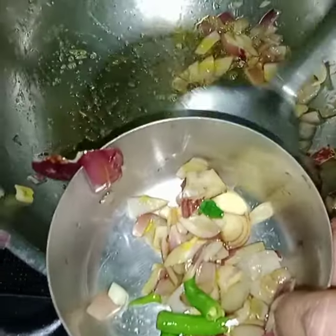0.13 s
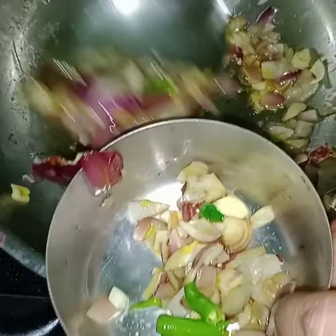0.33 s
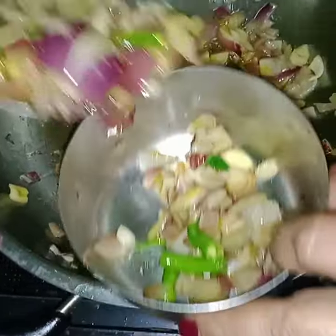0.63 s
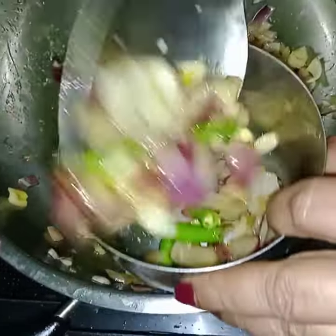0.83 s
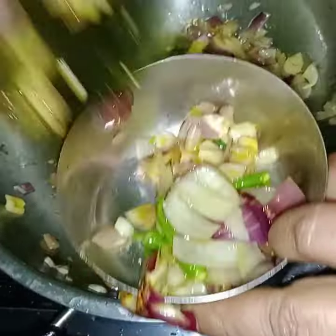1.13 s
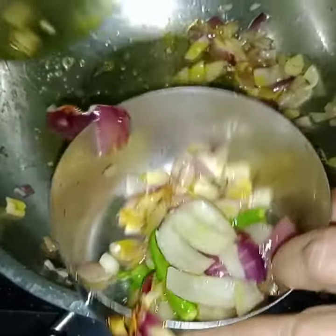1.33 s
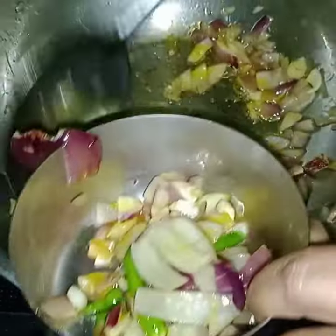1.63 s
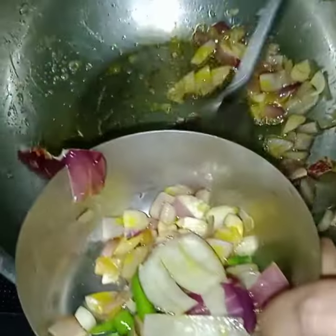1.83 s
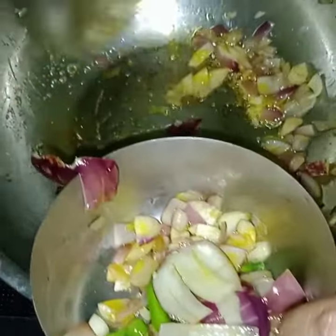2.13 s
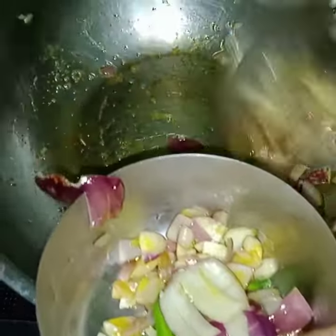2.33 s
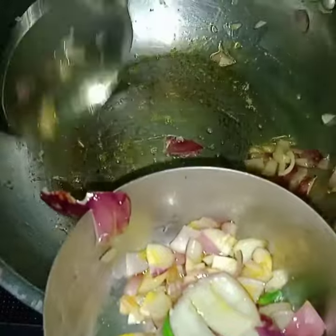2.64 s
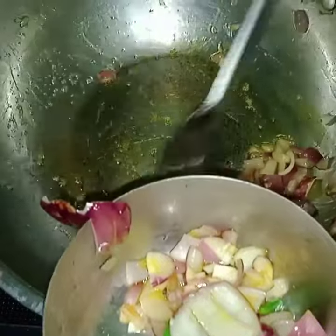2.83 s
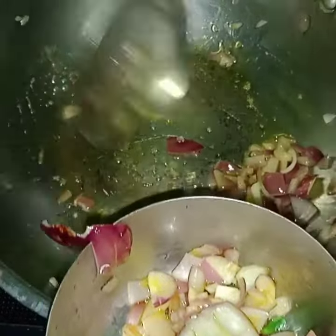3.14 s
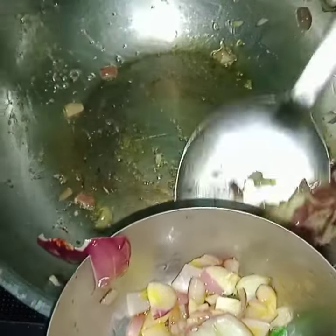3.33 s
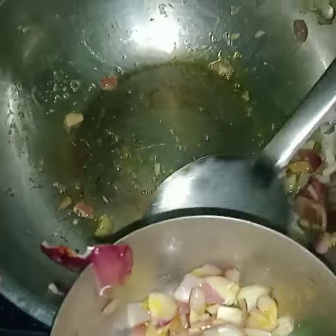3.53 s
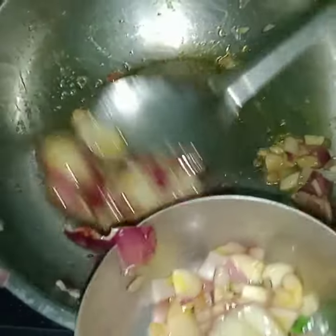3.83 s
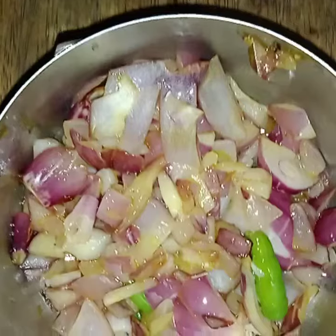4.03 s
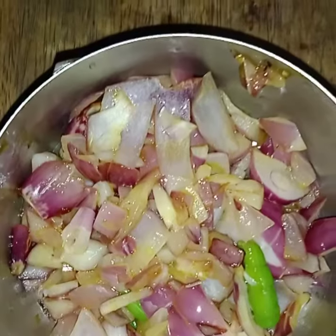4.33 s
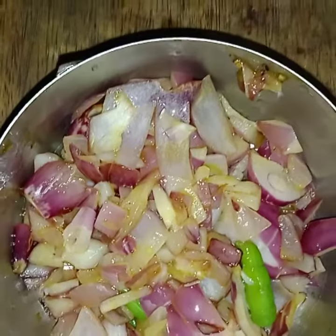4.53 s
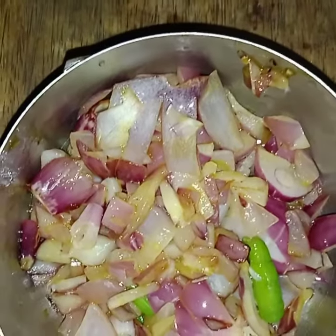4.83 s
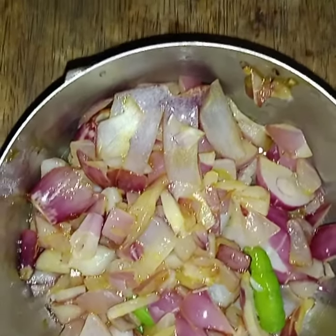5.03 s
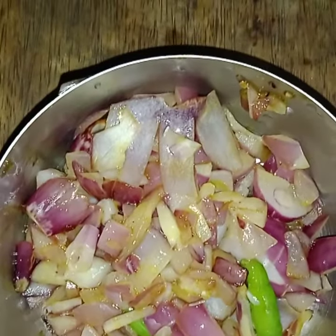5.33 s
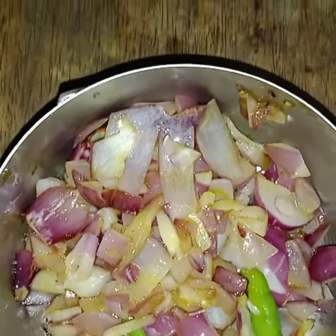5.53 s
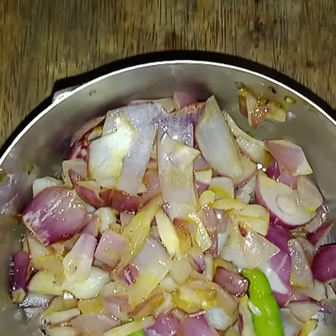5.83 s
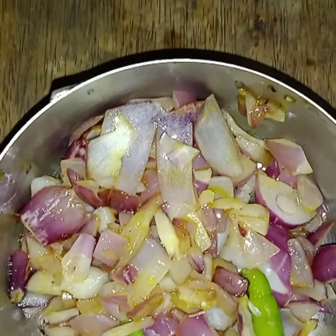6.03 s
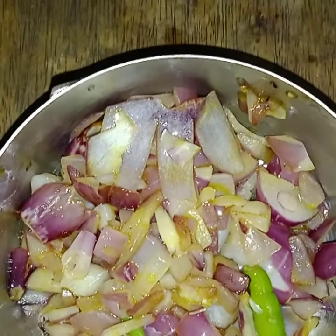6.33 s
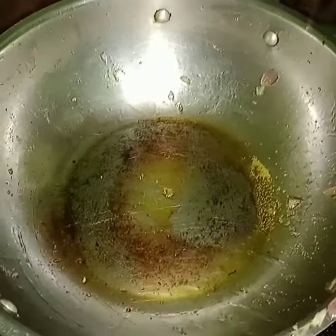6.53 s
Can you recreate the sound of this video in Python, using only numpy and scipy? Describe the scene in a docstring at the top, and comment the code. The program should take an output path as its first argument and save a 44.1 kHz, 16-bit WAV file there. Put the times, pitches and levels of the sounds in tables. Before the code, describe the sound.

A steady soft hiss with a low rumble runs throughout. A wavering whistle rises first, then a short bright rustle and ticks close by. Birds sweep quickly up and drop down, and one near bird gives three rising and falling whoops, each louder. Low hoots recur among distant whistles, and harsh rasping chatter crowds the end. The microphone is beside the hissing cooking, with the birds echoing among walls outside.

```python
"""First a wavering whistle rises over a steady hiss and low rumble; a rustle and a few ticks follow.
Birds outside a kitchen: a near one whoops three rising and falling calls, another sweeps fast arches
and falls, many more whistle, hoot and rasp. Bird notes are frequency-modulated sines, blurred by narrow
noise and echoed among walls. The hiss and rustle are filtered noise; ticks and thumps decay exponentially."""
import sys
import numpy as np
from scipy import signal
from scipy.fft import rfft, irfft
from scipy.io import wavfile
from scipy.ndimage import uniform_filter1d

SR = 44100
rng = np.random.default_rng(int(sys.argv[2]) if len(sys.argv) > 2 else 0)


def master(y):
    """Save y as 16-bit WAV."""
    cut = np.clip(np.atleast_2d(y).T, -1, 1)
    pcm = np.round(cut * 32767)  # scale
    wavfile.write(sys.argv[1], SR, pcm.astype(np.int16))


def boost(x):
    """Linear amplitude factor 10**(x/20) for a level x in decibels (scalar or array-like)."""
    u = np.asarray(x, float) / 20
    return 10 ** u


N = 294147


def evened(x):
    """Normalization: scales a signal to unit rms."""
    return x / np.sqrt(np.mean(abs(x) ** 2) + 1e-20)


def read(points, hz):
    """Spectral interpolation: reads a curve on a logarithmic frequency axis."""
    f, value = np.transpose(points)
    return np.interp(np.log(hz + 1), np.log(f + 1), value)


def add(mix, s, sound):
    """Superposition: adds a sound to the mix from time s."""
    part = mix[max(round(s * SR), 0):][:len(sound)]
    part += sound[:len(part)]


def wander(width_hz):
    """Narrow-band noise: complex, low-passed by two equal poles to vary about width_hz times a second."""
    r = np.exp(-np.pi * width_hz / SR)
    z = rng.standard_normal((N, 2)) @ [1, 1j]
    return evened(signal.lfilter([1], np.convolve([1, -r], [1, -r]), z))


def coloured(points, patchy_db):
    """Filtered noise: random short-time spectra follow a curve, with patches that drift in time."""
    a, b, patches = rng.standard_normal((N // 256 + 5, 513, 3)).T
    patches = uniform_filter1d(patches, size=12, axis=0)
    patches = evened(uniform_filter1d(patches, size=12, axis=1))
    shape_db = read(points, np.fft.rfftfreq(1024, 1 / SR))[:, None] + patchy_db * patches
    noise = signal.istft((a + 1j * b) * boost(shape_db), nperseg=1024, noverlap=768)[1]
    return evened(noise[:N])


# Steady noise floor, spectral density before scaling to unit rms: f/Hz, level/dB
FLOOR_SPECTRUM = [(18, -65), (30, -6), (97, 2), (332, -2.5), (512, -3), (771, -7), (970, -5.5), (2040, -8),
                  (2840, -6.5), (3140, -8), (4860, -15.5), (6270, -13), (10700, -29.5), (13500, -45)]
# Thin high fizz, rms level over time: t/s, level/dB
FIZZ_LEVEL = [(0.0, -91), (0.13, -80), (0.24, -66.5), (0.43, -80.5), (0.8, -87), (1.06, -82), (1.76, -77.5),
              (2.06, -82), (3.53, -85), (3.99, -77), (4.22, -83), (5.07, -81.5), (5.2, -80), (5.79, -72.5),
              (6.15, -76), (6.43, -81), (6.67, -74)]


def hiss():
    """Stationary broadband noise, with a band of fizz at the very top whose level varies in time."""
    fizz_spectrum = [(9000, -18), (13000, -13), (14500, -10.5), (15600, -3.5), (16400, -23.5)]
    fizz_db = np.interp(np.arange(N) / SR, *np.transpose(FIZZ_LEVEL))
    fizz = boost(fizz_db) * coloured(fizz_spectrum, patchy_db=2.5)
    return boost(-60) * coloured(FLOOR_SPECTRUM, patchy_db=1.3) + fizz


# Rustle, spectral density before scaling to unit rms: f/Hz, level/dB
RUSTLE_SPECTRUM = [(1500, 1.5), (4000, 0.5), (7500, 4.5), (10000, -13.5), (13000, -17), (15200, -18)]


def rustle():
    """Amplitude-modulated noise: a bright brush close to the microphone rises, holds, drops, trails off."""
    s = 0.079 + np.cumsum([-.04, .04, 0.077, 0.14, 0.0092, .09])
    level_db = [-95, -75, -55, -55, -73, -74]
    db = np.interp(np.arange(N) / SR, s, level_db, left=-150, right=-150)
    return boost(db) * coloured([(100, -37)] + list(RUSTLE_SPECTRUM), patchy_db=5.0)


# Dry ticks: t/s, nominal peak level/dB, centre f/Hz, width f/Hz, t60/s
TICK_BURSTS = [(.2194, -41, 7200, 9000, .015), (.2404, -40, 7100, 7700, 0.04),
               (.35, -51.5, 10000, 9000, .01), (.982, -47, 9000, 5000, 0.0092),
               (1.027, -47, 8900, 4000, 0.023), (1.146, -48.5, 8000, 6000, .008),
               (1.4486, -35, 15400, 2500, 0.0074), (1.4965, -52, 14800, 3000, 0.0068),
               (1.5703, -53.5, 15200, 2500, 0.022), (1.676, -52, 12000, 9000, 0.0077),
               (4.5112, -46, 7000, 5000, 0.0071), (4.5475, -36.5, 5000, 12000, 0.017)]


def ticks():
    """Impulsive noise: each tick is a spark in one Gaussian band under exponential decay."""
    out, t, hz = np.zeros(N), np.arange(4096) / SR, np.fft.rfftfreq(4096, 1 / SR)
    for s, db, centre_hz, width_hz, t60 in TICK_BURSTS:
        spectrum = rfft(rng.standard_normal(4096))
        band = evened(irfft(spectrum * np.exp(-2 * ((hz - centre_hz) / width_hz) ** 2)))
        add(out, s, boost(db - 6 - 60 * t / t60) * band)  # rms starts 6 dB under the nominal peak
    return out


# Thumps: t/s, amplitude level before decay/dB, swing f/Hz, t60/s
THUMP_SWINGS = [(0.221, -47, 90, 0.067), (0.24, -44, 101, 0.047), (4.5121, -21.5, 680, 0.0015)]


def thumps():
    """Damped oscillation: each thump is a sine under exponential decay."""
    out, t = np.zeros(N), np.arange(4096) / SR
    for s, db, swing_hz, t60 in THUMP_SWINGS:
        add(out, s, -boost(db - 60 * t / t60) * np.sin(2 * np.pi * swing_hz * t))
    return out


# Reverberation time of the walls by band (held to at least 0.05 s when read): f/Hz, t60/s
WALL_DECAY = [(800, 0.58), (1600, 0.59), (3000, 0.45), (6000, 0.57), (12000, 0.049)]


def walls(x):
    """Reverberation: sparse echoes of random sign, each band decaying exponentially at its own speed."""
    taps = np.zeros(SR)
    at = np.arange(160, SR - 20, 20)
    taps[at + rng.integers(0, 20, len(at))] = rng.choice([-1., 1.], len(at))
    taps *= 1 + 0.75 * np.exp(-np.arange(SR) / SR / 0.015)  # the nearest walls answer first and strongest
    hz, t, z = signal.stft(taps, SR, nperseg=256)
    t60 = np.maximum(read(WALL_DECAY, hz), .05)
    tail = signal.istft(z * boost(-60 * t / t60[:, None]), SR, nperseg=256)[1]
    return signal.fftconvolve(x, tail / np.linalg.norm(tail))[:N]


# Throat filter on the whooping bird's overtones: f/Hz, level/dB
THROAT_FILTER = [(2400, -4), (3200, -5), (4500, -26), (5200, -4), (6200, 2), (7400, 0), (8200, -6),
                 (8900, -17), (10500, -25), (13000, -45)]


def sing(notes, rough, width_hz, second_db, glide_s, waver=0, flicks=None):
    """Frequency modulation: a sine on each pitch line, a rough share blurred, plus octave or overtones."""
    out, blur = np.zeros(N), wander(width_hz)
    for k, rows in enumerate(notes):
        s, hz, db, *overtones_db = np.transpose(rows)
        t = np.arange(s[0], s[-1], 1 / SR)
        hz = uniform_filter1d(np.interp(t, s, hz), round(glide_s * SR), mode="nearest")
        db = np.interp(t, s, db)
        shake = np.resize(blur[round(s[0] * SR):], len(t))
        if flicks:  # the pitch rests on its line and darts off in U shapes, fainter while away
            rate, reach, uneven = flicks[k]
            away = np.cos(np.pi * np.cumsum(rate * (1 + uneven * shake.imag)) / SR) ** 4
            hz, db = hz * (1 + reach * away), db - 8 * away - 16 * away ** 2
        turn = np.exp(2j * np.pi * np.cumsum(hz * (1 + waver * shake.imag)) / SR)
        # the octave is strongest on high notes that drop fast
        falling = np.clip(-np.gradient(hz) * SR / 25000, .15, 1)
        high = np.clip((hz - 2500) / 500, .15, 1)
        octave = boost(second_db) * falling * high
        tone = boost(db) * (turn + octave * turn ** 2)
        for m in range(2, 9) if overtones_db else []:  # each overtone fades in and out on its own
            level_db = np.interp(t, s, overtones_db[0]) + read(THROAT_FILTER, m * hz) - 7 * (m > 5)
            tone += boost(level_db) * turn ** m * (.55 + .7 * np.roll(shake, m * 900))
        edge = np.clip(np.minimum(t - s[0], s[-1] - t) / 0.0007, 0, 1)
        blurred = tone * (np.sqrt(1 - rough) + np.sqrt(rough) * shake)
        add(out, s[0], np.sqrt(2) * blurred.real * edge)
    return out


def swell(row, swell_db, fade_db):
    """Attack and decay: a note grows to its peak, gliding, and dies away."""
    s, rise, fall_s, first, last, db = row[:6]
    settle = 0.394  # share of the fall in which the glide ends
    return [(s, first, db - swell_db),
            (s + rise, first + .8 * (last - first), db),  # the glide is mostly done at the peak
            (s + rise + settle * fall_s, last, db - settle * fade_db),
            (s + rise + fall_s, last, db - fade_db)]


def crowd():
    """Random superposition: rows of faint short notes, as whistles, for many distant birds."""
    when, pitch, glide, size, long = rng.random((300, 5)).T
    low_hz, high_hz = 1800, 6500
    hz = low_hz * (high_hz / low_hz) ** pitch ** 1.3
    last_hz = hz * (1 + .06 * (3 * glide - 1))
    rise_s, fall_s = .06 * (0.188 + long / 2), .06 * (0.14 + long)
    db = -70 + 3 * (2 * size - 1)
    return np.transpose([when * (N / SR - .1), rise_s, fall_s, hz, last_hz, db])


# Faint level notes: start t/s, length t/s, first f/Hz, last f/Hz, level/dB
HELD_NOTES = [(0.332, 0.081, 4630, 4690, -61.5), (0.36, .14, 3590, 3430, -56),
              (0.503, 0.026, 5900, 6230, -68), (.852, 0.036, 5850, 5980, -70),
              (0.882, 0.025, 6040, 5300, -71), (0.92, 0.018, 2400, 2350, -59), (1.89, .13, 2600, 2450, -61),
              (2.281, 0.074, 3010, 2750, -65), (2.285, 0.056, 6080, 5600, -70.5),
              (3.4, .06, 1920, 1750, -62), (4.236, .12, 2594, 2915, -64), (4.554, 0.057, 4690, 4750, -60),
              (4.951, 0.056, 5920, 6580, -64), (5.845, .02, 6550, 6550, -62),
              (6.453, .027, 4500, 2900, -53), (6.479, 0.032, 3131, 4500, -51),
              (6.655, 0.022, 3688, 3750, -55.5)]
# Whistles that swell and die: start t/s, rise t/s, fall t/s, first f/Hz, last f/Hz, peak level/dB
WHISTLE_NOTES = [(.015, 0.052, 0.039, 2003, 2963, -48.5), (0.114, .045, 0.078, 4136, 4155, -50.5),
                 (.715, 0.0089, 0.012, 4840, 5560, -61), (.755, .025, .03, 4200, 4300, -50),
                 (0.813, .025, 0.023, 2490, 2910, -59), (.815, .01, .01, 4770, 5600, -59),
                 (1.549, 0.034, .04, 2516, 2785, -41.5), (1.646, 0.03, 0.074, 4100, 4440, -47.5),
                 (2.52, .045, 0.139, 2294, 2903, -48.5), (3.19, 0.046, .08, 2845, 2828, -58),
                 (3.329, .06, 0.083, 1960, 2764, -52.5), (3.4, 0.014, .06, 3110, 4340, -62),
                 (3.571, .045, 0.066, 2250, 2900, -48), (3.78, .07, 0.012, 2880, 2990, -60),
                 (3.918, 0.045, 0.062, 2485, 2750, -46.5), (4.412, 0.069, 0.093, 2440, 2870, -41.5),
                 (4.579, 0.055, 0.155, 3480, 3210, -51), (4.599, 0.0057, 0.048, 2780, 3170, -50),
                 (4.63, 0.0044, 0.099, 4020, 4550, -58.5), (4.85, 0.039, 0.022, 2850, 2814, -62.5),
                 (4.851, .03, 0.09, 5450, 5620, -59), (5.09, 0.0179, .005, 2680, 2860, -55.5),
                 (6.195, .022, .005, 6180, 5890, -54.5), (6.31, .02, .015, 2470, 2700, -50),
                 (6.34, .12, .11, 2230, 2883, -41.5), (6.38, 0.0505, 0.029, 1980, 2290, -47.5),
                 (6.41, 0.031, .005, 4140, 4680, -50), (6.431, 0.0357, .005, 5310, 6120, -55.5),
                 (6.555, 0.0328, 0.057, 4885, 5125, -44.5)]


def whistles():
    """Gliding tones: whistles and the crowd swell and die, faint held notes keep a constant level."""
    rows = list(WHISTLE_NOTES) + list(crowd())
    notes = [swell(row, swell_db=11, fade_db=19.5) for row in rows]
    notes += [[(s, first, db), (s + length, last, db)] for s, length, first, last, db in HELD_NOTES]
    return sing(notes, rough=0.38, width_hz=140, second_db=-29, glide_s=0.011)


# Faint far notes that drift slowly in pitch: start t/s, length t/s, first f/Hz, middle f/Hz, last f/Hz,
# level/dB
FAR_NOTES = [(.005, .62, 1490, 1490, 1220, -71), (.265, .465, 2960, 2995, 3010, -57),
             (.92, .04, 1068, 1060, 1055, -61), (2.48, .45, 1200, 1365, 1320, -67),
             (2.8, .15, 1015, 985, 950, -66), (5.4, .12, 520, 514, 507, -63), (5.9, .2, 862, 940, 955, -65),
             (6.2, .24, 953, 950, 897, -67), (6.2, .46, 1460, 1480, 1360, -69.5)]


def far_notes():
    """Parabolic glide: faint, wavering far calls and one long pulsing whistle drift slowly in pitch."""
    notes, u = [], np.linspace(-1, 1, 9)
    for s, length, first, middle, last, db in FAR_NOTES:
        hz = middle + (np.where(u < 0, first, last) - middle) * abs(u) ** 2
        notes.append(list(zip(s + length * (u + 1) / 2, hz, db + 0 * u)))
    return sing(notes, rough=.65, width_hz=35, second_db=-30, glide_s=0.05)


# Hoots: loudest t/s, f/Hz, level/dB
HOOT_NOTES = [(1.74, 879, -38.5), (2.98, 873, -40), (4.15, 871, -39.5), (5.32, 908, -41),
              (6.59, 884, -40.5)]
# One hoot's contour: t/s from the loudest moment, share of f, relative level/dB
HOOT_CONTOUR = [(-.026, .87, -18.5), (0, 1, -0.5), (.03, .99, -10.5), (0.06, 0.96, -13.5)]


def hoots():
    """Scaled contour: every low hoot repeats one pitch and level curve."""
    notes = [[(s + ds, hz * share, db + d) for ds, share, d in HOOT_CONTOUR] for s, hz, db in HOOT_NOTES]
    return sing(notes, rough=0.16, width_hz=40, second_db=-44, glide_s=0.0067)


# Harsh notes: start t/s, rise t/s, fall t/s, first f/Hz, last f/Hz, level before flicks/dB,
# reach of the flicks as a share of f
RASP_NOTES = [(0.117, 0.031, 0.047, 4136, 4155, -50.5, .1), (0.734, 0.031, 0.06, 2855, 4295, -53.5, 0.2),
              (0.744, 0.026, 0.046, 2900, 3540, -61, 0.3), (1.121, 0.007, 0.22, 2794, 2640, -52, 0.97),
              (2.374, 0.027, 0.057, 2900, 4200, -61, -.2), (2.975, .02, 0.059, 4040, 4330, -60, 0.18),
              (2.989, .03, 0.068, 3080, 2820, -57, .6), (3.651, 0.046, 0.088, 3720, 4050, -48.5, 0.1),
              (4.0, .04, .09, 4380, 4025, -49, 0.23), (5.44, 0.055, .06, 3066, 2950, -44.5, 0.81),
              (5.655, 0.034, 0.06, 5840, 5110, -35, .3), (5.7, 0.053, 0.054, 5040, 4894, -37.5, 0.15),
              (5.701, 0.061, 0.054, 2640, 2984, -46, 0.74), (5.83, 0.058, 0.063, 3500, 3210, -37.5, 0.61),
              (5.96, 0.041, 0.083, 3240, 3260, -57, .55), (5.878, .03, 0.21, 7360, 7440, -57, 0.18),
              (5.929, 0.036, 0.099, 4950, 4780, -48.5, 0.41), (6.021, 0.045, .12, 4600, 4180, -49, 0.4),
              (6.065, 0.026, 0.058, 2800, 2903, -39.5, 0.61), (6.14, 0.044, 0.093, 2900, 2837, -42.5, 0.6),
              (6.36, .06, 0.095, 2000, 2300, -52, .25), (6.545, 0.004, .12, 4625, 5000, -43, 0.18)]


def rasps():
    """Fast frequency modulation: uneven flicks of pitch and level make the notes harsh."""
    notes = [swell(row, swell_db=13, fade_db=9) for row in RASP_NOTES]
    flicks = [(130, row[-1], .52) for row in RASP_NOTES]  # flicks per second, reach, unevenness
    return sing(notes, rough=0.62, width_hz=90, second_db=-22, glide_s=0.015, flicks=flicks)


def trill():
    """Periodic frequency modulation: one near note flicks almost evenly in pitch."""
    note = swell((1.172, .04, .028, 3770, 3790, -45), swell_db=8, fade_db=4)
    flicks = [(60.8, .3, .019)]  # flicks per second, reach as a share of pitch, unevenness
    return sing([note], rough=.08, width_hz=90, second_db=-14, glide_s=.01, flicks=flicks)


# A near dropping note and a near curling note, point by point: t/s, f/Hz, level/dB
DROP_AND_CURL_NOTES = [
    [(.99, 3570, -54), (1.015, 3506, -60), (1.04, 2817, -36.5), (1.08, 1580, -52)],
    [(1.245, 3150, -43), (1.268, 3075, -37), (1.31, 3075, -37.5), (1.322, 3100, -44), (1.335, 3610, -52),
     (1.355, 4040, -57), (1.378, 3800, -53)],
]


def drop_and_curl():
    """Frequency glide: one near note plunges, another holds and curls upward."""
    return sing(DROP_AND_CURL_NOTES, rough=.02, width_hz=120, second_db=-18, glide_s=.008)


# Arches: start t/s, length t/s, level/dB
ARCH_NOTES = [(0.966, .06, -51), (1.313, 0.067, -51.5), (1.645, 0.064, -50), (1.989, .062, -52)]
# One arch's contour: share of length, f/Hz, relative level/dB
ARCH_CONTOUR = [(0, 4050, -19), (.17, 6400, 2), (.35, 6950, -9), (.65, 7170, -14.5), (.88, 7050, -1),
                (1, 4000, -4)]


def arches():
    """Scaled contour: each fast sweep climbs steeply and drops along one arch."""
    notes = [[(s + length * u, hz, db + d) for u, hz, d in ARCH_CONTOUR] for s, length, db in ARCH_NOTES]
    return sing(notes, rough=.1, width_hz=80, second_db=-30, glide_s=.004)


def fall(s, hz, db, low_hz, tail):
    """Downward chirp: a sweep starts high, flares briefly mid-drop and levels out low."""
    start_hz, lead_s, knee_s, peak_s = 3810, 0.04, .03, 0.01
    bend_hz, knee_hz = .93 * start_hz, 1.11 * low_hz
    before_hz = hz + (bend_hz - hz) * peak_s / (lead_s / 2)
    after_hz = hz + (knee_hz - hz) * peak_s / knee_s
    return [(s - lead_s, start_hz, db - 13.5), (s - lead_s / 2, bend_hz, db - 20),
            (s - peak_s, before_hz, db - 10), (s, hz, db), (s + peak_s, after_hz, db - 10),
            (s + knee_s, knee_hz, db - 11), (s + 2 * knee_s, low_hz, db - 12),
            (s + 2 * knee_s + tail, low_hz, db - 23.5)]


# Falling sweeps, each taking over from an arch: loudest t/s, f/Hz there, level/dB, lowest f/Hz, tail t/s
FALL_NOTES = [(1.068, 2720, -36, 1690, 0.073), (1.418, 2636, -35.5, 1757, 0.039),
              (1.747, 2750, -36, 1713, 0.032), (2.088, 2845, -36, 1738, 0.036)]


def falls():
    """Chirp with octave: the falling sweeps carry a second harmonic that grows with fast drops."""
    return sing([fall(*row) for row in FALL_NOTES], rough=.1, width_hz=120, second_db=-14, glide_s=.008)


# The near bird's three calls, point by point: t/s, f/Hz, level/dB, overtone level before the throat/dB
WHOOP_CALLS = [
    [(1.53, 1144, -54, -73), (1.62, 1082, -47, -75), (1.74, 1084, -48.5, -59), (1.8, 1197, -41.5, -65),
     (1.85, 1314, -48.5, -60), (1.9, 1400, -48, -57), (1.95, 1348, -37, -71), (2.0, 1024, -49, -67),
     (2.06, 850, -57.5, -80)],
    [(3.664, 1760, -65, -91), (3.675, 1223, -47, -72), (3.755, 1168, -42.5, -64), (3.9, 1238, -38.5, -64.5),
     (3.94, 1337, -44, -56), (3.98, 1449, -30.5, -60), (4.02, 1503, -27, -56.5), (4.07, 1425, -37.5, -59.5),
     (4.12, 1130, -36, -60.5), (4.19, 850, -50.5, -77)],
    [(5.244, 1796, -55.5, -93), (5.257, 1376, -45, -68), (5.3, 1332, -39.5, -58.5),
     (5.36, 1296, -46.5, -64), (5.42, 1318, -41, -62.5), (5.48, 1384, -33.5, -58.5),
     (5.53, 1566, -26.5, -64), (5.588, 1621, -19.5, -54.5), (5.64, 1422, -35.5, -63.5),
     (5.7, 1197, -36.5, -86), (5.8, 860, -49.5, -92)],
]


def whoops():
    """Source and filter: a near, clean gliding tone whose overtones pass through the throat."""
    return sing(WHOOP_CALLS, rough=.05, width_hz=60, second_db=-5, glide_s=.016, waver=.007)


def birds():
    """Direct and reverberant sound: each voice is heard directly and sends its own share to the walls."""
    voices = [(whoops(), -7.5), (falls(), -7), (drop_and_curl(), -10), (arches(), -7), (hoots(), -25.5),
              (far_notes(), -4), (whistles(), -4), (rasps(), -2.5),
              (trill(), -10)]  # (sound, send to the walls in dB)
    direct = sum(sound for sound, _ in voices)
    sent = sum(boost(send_db) * sound for sound, send_db in voices)
    return direct + walls(sent)


def scene():
    """Superposition: all sources add at one microphone."""
    return (birds() + hiss() + rustle() + ticks() + thumps())[None]


def roll_off(x):
    """The treble ends steeply here."""
    return signal.sosfilt(signal.butter(12, 16370, fs=SR, output="sos"), x)


def record(dry):
    """High-pass filtering: the microphone loses the deepest bass, below about 62 Hz."""
    bass_cut = signal.butter(2, 62, "high", fs=SR, output="sos")
    mix = signal.sosfilt(bass_cut, dry)
    return roll_off(mix)


dry = scene()
out = record(dry)
master(out)
```